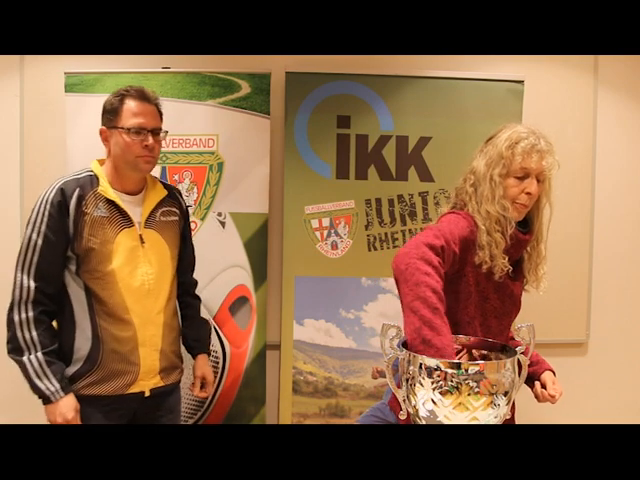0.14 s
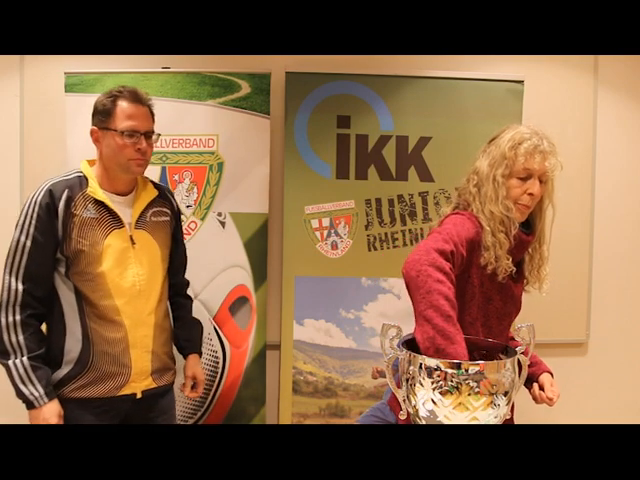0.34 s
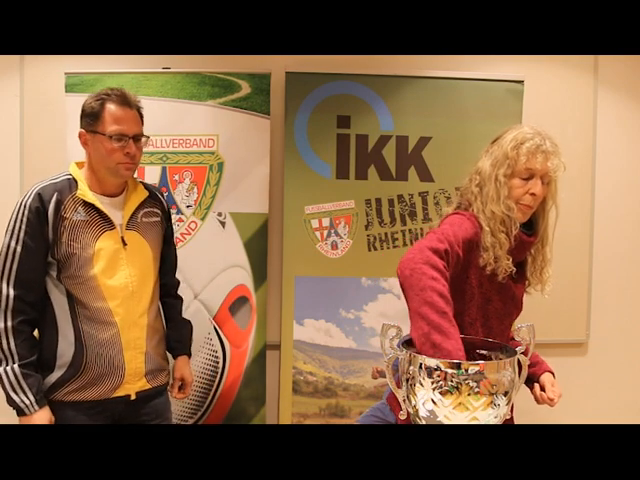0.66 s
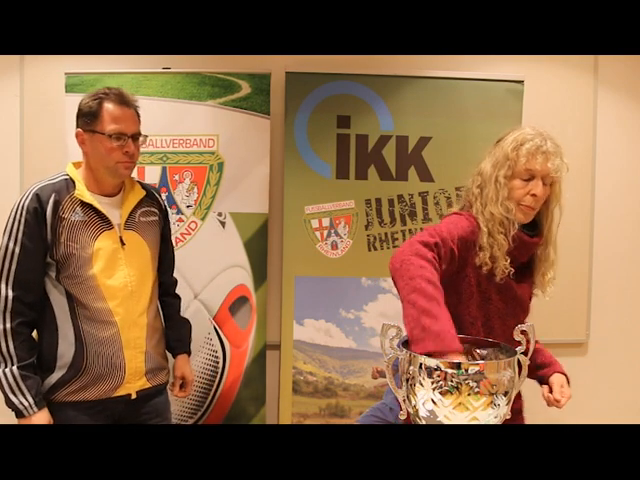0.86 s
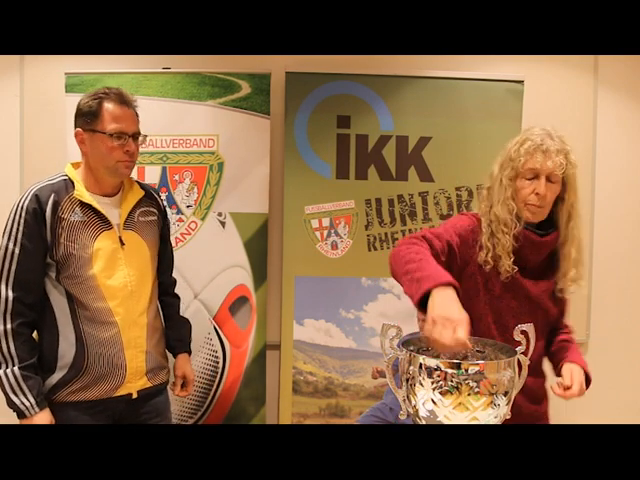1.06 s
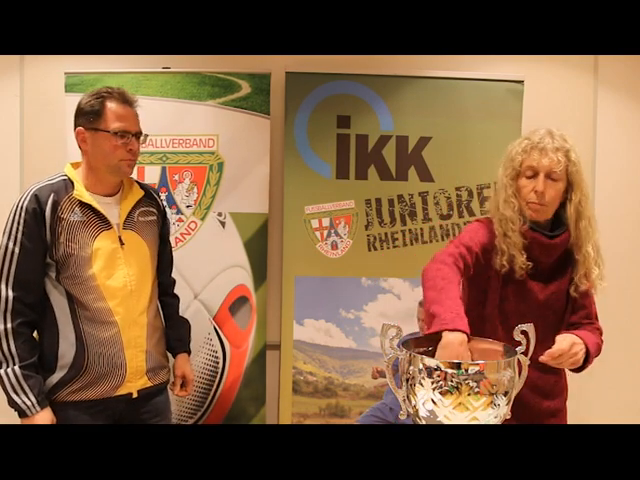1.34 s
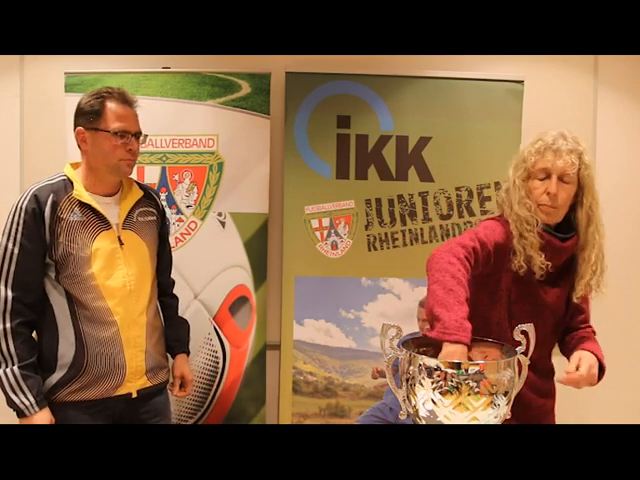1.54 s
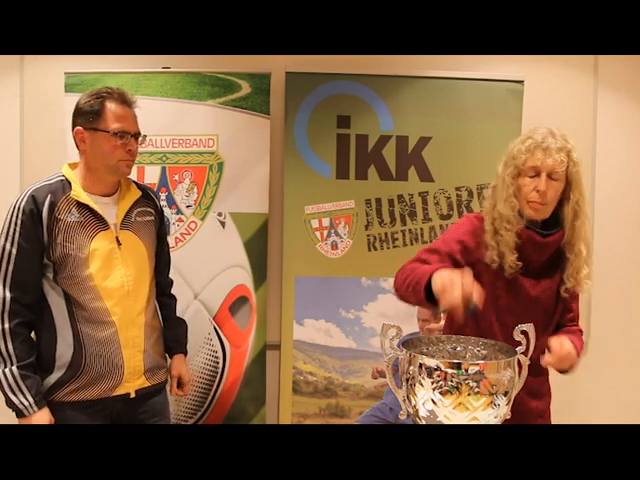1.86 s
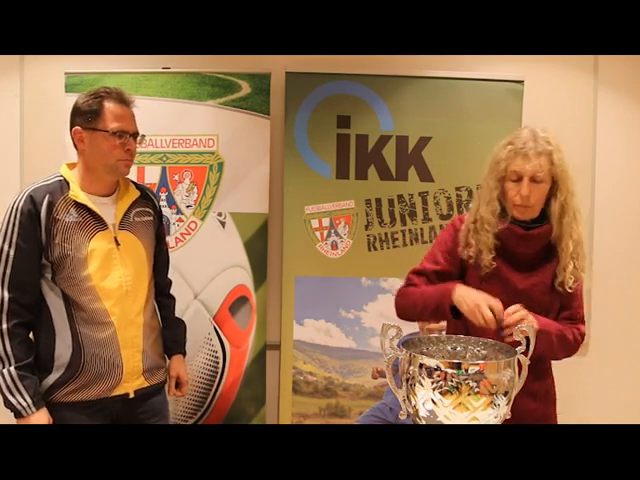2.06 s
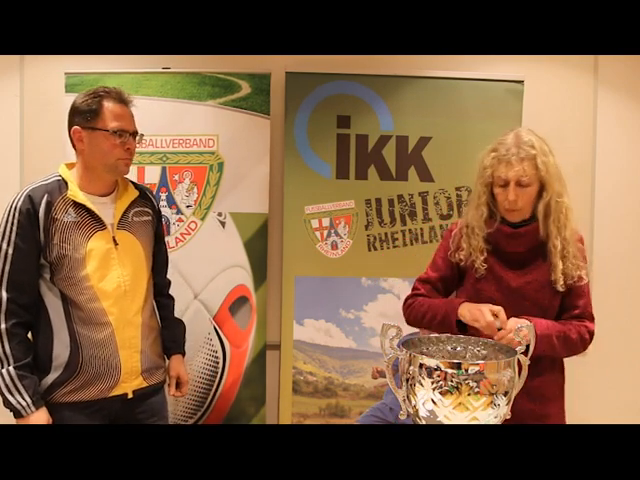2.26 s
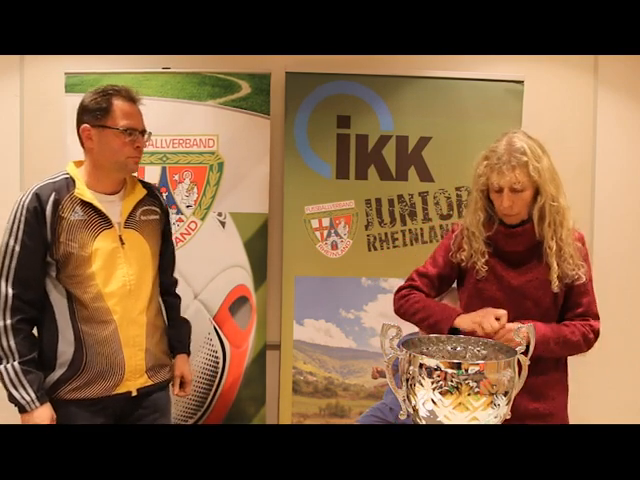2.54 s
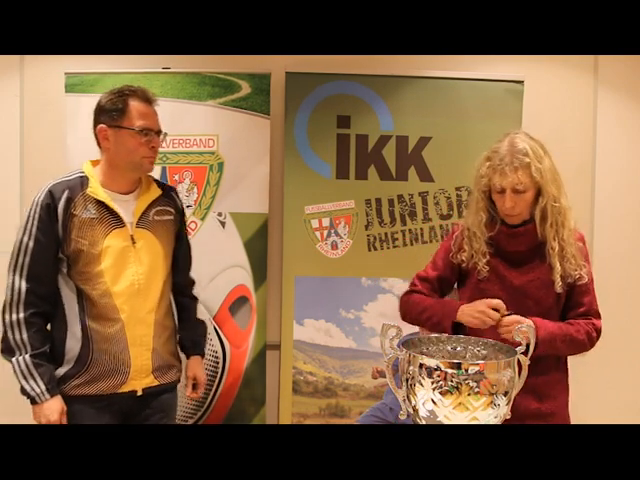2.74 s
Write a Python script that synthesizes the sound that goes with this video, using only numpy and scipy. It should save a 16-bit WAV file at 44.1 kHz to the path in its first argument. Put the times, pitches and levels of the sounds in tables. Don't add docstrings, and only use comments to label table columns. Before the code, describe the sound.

Hard little capsules are stirred by hand in a large metal cup, clattering and ringing brightly; then quiet finger rustling and a sharp snap as one opens, close to the microphone in a slightly echoing office.

```python
import sys
import numpy as np
from scipy import signal
from scipy.fft import rfft, irfft, next_fast_len
from scipy.io import wavfile
from scipy.ndimage import uniform_filter1d

SR = 44100
rng = np.random.default_rng(int(sys.argv[2]) if len(sys.argv) > 2 else 0)


def gain_from_db(level_db):
    decades = np.asarray(level_db, float) / 20
    return 10 ** decades


def put_to_file(sound):
    columns = np.atleast_2d(sound).T
    safe = np.clip(columns, -1, 1)
    whole_steps = np.round(safe * 32767)
    wavfile.write(sys.argv[1], SR, whole_steps.astype(np.int16))


N = 127890


def unit(x):
    return x / np.sqrt(np.mean(x ** 2) + 1e-20)


def along(points, hz):
    f, value = np.transpose(points)
    return np.interp(np.log(hz + 1), np.log(f + 1), value)


def curve(rows, s):
    return np.interp(s, *np.transpose(rows))


def filtered(x, response):
    m = next_fast_len(N + SR // 2)
    return irfft(rfft(x, m) * response(np.fft.rfftfreq(m, 1 / SR)), m)[..., :N]


def spikes(s, size):
    place = np.clip(np.round(s * SR).astype(int), 0, N - 1)
    return np.bincount(place, size, N)


def decay(t60):
    return gain_from_db(-60 / (t60 * SR))


def ring(x, hz, t60):
    r = decay(max(t60, 0.002))
    w = 2 * np.pi * min(hz, SR * 0.45) / SR
    return signal.lfilter([0, np.sin(w)], [1, -2 * r * np.cos(w), r * r], x)


def burst(x, t60):
    envelope = signal.lfilter([1], [1, -decay(max(t60, 0.001))], np.abs(x))
    return envelope * rng.standard_normal(N)


# t/s, peak level/dB, brightness/dB per octave, loudest region f/Hz
KNOCKS = [(0, -5, -5, 1520), (.3015, -5, 4, 6960), (.947, -17, -10, 1120), (1.142, 2, 4, 3380),
          (1.31, -4.5, -3, 1150), (1.6, -10, -2.5, 1140), (0.0142, -21, 9, 1880),
          (0.0794, -0.5, -0.5, 1810), (0.1, -2.5, -3, 3100), (0.1235, -1.5, 0, 4840), (0.184, -1, -2, 2700),
          (0.205, -2, -1.5, 1890), (0.3639, 1, -0.5, 3580), (0.4095, -6, -4, 2900), (0.354, -6, 2, 5000),
          (0.4806, -5, -4, 2900), (0.5403, -1.5, -2, 1950), (0.5794, -3, -9, 3040), (0.61, -5.5, 0, 1120),
          (0.6211, -2, 3.5, 3250), (0.6546, -12.5, -1, 2960), (1.317, -14, 5, 6500),
          (0.8196, -19, 1.5, 1790), (0.9089, -10.5, -2, 1840), (1.2339, -0.5, 3, 1810),
          (1.2529, -7.5, -0.5, 1830), (1.3391, -1.5, -3, 1820), (1.3547, -8.5, 1.5, 2660),
          (1.3894, -11, -5, 1820), (1.5382, -4.5, 2, 1650)]
# t/s, level/dB
STIRRING = [(0, -8.5), (.1, -30.5), (.25, -18.5), (.45, -21.5), (.6, -16.5), (.72, -20), (.85, -29.5),
            (.97, -29), (1.08, -54), (1.2, -22), (1.33, -17), (1.43, -23.5), (1.52, -30.5), (1.57, -16.5),
            (1.65, -39.5), (1.74, -47), (1.82, -57)]
# t/s, brightness/dB per octave
DIGGING = [(0, -3.5), (.6, -2), (.95, -4.5), (1.2, -1.5), (1.4, -4.5), (1.7, -6)]


def contacts():
    rattle_per_s, spread_db = 480, 2.5
    draw = rng.random((1200, 2))
    last = STIRRING[-1][0]
    s = np.cumsum(-np.log(1 - draw[:, 0])) / rattle_per_s
    s = np.minimum(s, last)
    db = curve(STIRRING, s) - spread_db * np.log(1 - draw[:, 1]) + 0.5
    db = db - 200 * (s >= last)
    rattle = np.transpose([s, db, curve(DIGGING, s)])
    return np.vstack([np.array(KNOCKS)[:, :3], rattle]).T


BOWL_HZ = [1069, 1126, 1224, 1413, 1778, 1796, 1822, 1867, 2069, 2229, 2423, 2478, 2628, 2721]
# level/dB, t60/s
BOWL = [(-12.5, 0.53), (-28.5, 0.98), (-5.5, 0.23), (-22.5, 0.77), (-3, 0.35), (-1.5, 0.07), (4, 0.058),
        (3, 0.26), (-3, 0.13), (-5.5, 0.69), (-16, 0.6), (-17.5, 0.42), (-14, 0.36), (-6.5, 0.14)]
RIM_HZ = [1555, 2385, 2574, 2737, 2769, 2832, 2944, 3073, 3264, 3530, 3833, 4215, 4323, 4938]
# level/dB, t60/s
RIM = [(-32.5, 2.3), (-20, 1.5), (-16, 0.57), (-12, 1.06), (-9, 0.78), (-1, 0.28), (-2.5, 0.91),
       (-17, 0.28), (-22, 0.18), (-4, 0.15), (-1, 0.11), (-4.5, 0.23), (-0.5, 0.039), (-1.5, 0.15)]
# f/Hz, level/dB
CROWD = [(500, -48.5), (900, -25.5), (1800, -15.5), (3200, -13.5), (5400, -22), (7000, -22.5),
         (10000, -27.5), (16000, -45)]
# f/Hz, t60/s
CROWD_T60 = [(500, 0.045), (2000, 0.15), (6000, 0.24), (16000, 0.15)]


def cup():
    s, db, tilt_db = contacts()
    tilt_db = np.clip(tilt_db, -12, 7)

    draw = rng.random((480, 2))
    hz = 700 + 15300 * np.sort(draw[:, 0]) ** 1.3
    crowd_t60 = along(CROWD_T60, hz) * (0.6 + 0.5 * draw[:, 1])
    crowd = np.transpose([hz, along(CROWD, hz), crowd_t60])
    modes = np.vstack([np.c_[BOWL_HZ, BOWL], np.c_[RIM_HZ, RIM], crowd])
    mode_hz, mode_db, mode_t60 = modes.T
    main = np.arange(len(modes)) < len(BOWL) + len(RIM)

    spot = rng.standard_normal((len(s), len(modes)))
    spot_db, ring_db, shared_ring_db = 3.5, -20, -4
    gain_db = db[:, None] + spot_db * spot + tilt_db[:, None] * np.log2(mode_hz / 2500)
    gain_db += mode_db + ring_db + shared_ring_db * main

    patches = uniform_filter1d(rng.standard_normal((len(s), len(crowd))), size=30, axis=1)
    gain_db[:, -len(crowd):] += 2.5 * unit(patches)

    splash_db, splash_octaves, knock_ring_db = 7.5, 0.17, -4.5
    octaves = np.log2(mode_hz[:, None].T / np.array(KNOCKS)[:, 3:])
    splash = splash_db * np.exp(-0.5 * (octaves / splash_octaves) ** 2)
    gain_db[:len(KNOCKS)] += splash + knock_ring_db * main

    gains = np.sign(spot[:, ::-1]) * gain_from_db(gain_db)
    metal = np.zeros(N)
    for g, f, t60 in zip(gains.T, mode_hz, mode_t60):
        metal += ring(spikes(s, g), f, t60)

    clear = np.arange(len(s)) < len(KNOCKS)
    blows = spikes(s, clear * gain_from_db(db + tilt_db))
    crack_db, crack_s, tick_db, tick_s = -11, 0.035, -13, 0.0032
    cracks = gain_from_db(crack_db) * burst(blows, crack_s) + gain_from_db(tick_db) * burst(blows, tick_s)
    return metal + filtered(cracks, lambda f: gain_from_db(along(CROWD, f) + 17))


CLINK_HZ = [1093, 1413, 4215, 1069, 1224, 1555, 1778, 1822, 1867, 2069, 2229, 2385, 2423, 2478, 2574, 2769,
            2832, 2944, 3155, 3264, 3530, 4323, 4748, 4938, 5787, 6500]
# t/s, level/dB
CLINKS = [(0.44, [(.99, -33), (1.143, -27.5)]), (0.37, [(.014, -34), (.205, -23.5), (.75, -40.5)]),
          (.2, [(.3015, -26), (.625, -19)]), (.55, [(1.31, -16.5), (1.39, -26.5), (1.6, -28.5)]),
          (0.27, [(.947, -30), (1.01, -26), (1.31, -31), (1.63, -22)]), (1.4, [(1.54, -33)]),
          (0.17, [(0, -28), (.505, -12), (.909, -35), (1.144, -16), (1.253, -17), (1.339, -19),
          (1.58, -19)]), (0.28, [(.012, -11.5), (.0794, -21.5), (.125, -20), (.3, -22), (.5403, -21),
          (1.2335, -11)]), (0.62, [(.034, -18), (.205, -19.5), (1.575, -35)]), (0.32, [(.025, -18.5),
          (.385, -19.5)]), (0.62, [(.515, -19), (.82, -34.5), (.92, -34.5), (1.253, -28), (1.58, -31)]),
          (0.71, [(1.3547, -20.5), (1.545, -31)]), (0.94, [(.909, -29)]), (0.7, [(.75, -46)]),
          (1.2, [(.26, -23), (.505, -24.5), (1.6, -48), (1.69, -39)]), (0.32, [(.11, -32), (.65, -16.5),
          (.83, -28), (1.585, -30)]), (0.63, [(.03, -18.5), (.094, -11), (.184, -23), (.345, -23.5),
          (.4, -18), (.46, -21.5), (.575, -27), (.645, -36)]), (0.38, [(.018, -14), (.5403, -19),
          (1.24, -24), (1.55, -23)]), (0.43, [(1.142, -18.5)]), (.25, [(.2, -18.5), (.3639, -15),
          (1.15, -22.5)]), (0.22, [(.3639, -22)]), (0.26, [(.3015, -21), (.621, -14), (.92, -31.5),
          (1.277, -24), (1.545, -24)]), (.15, [(1.148, -21)]), (.15, [(1.2335, -22), (1.54, -34)]),
          (0.22, [(.545, -26.5), (1.142, -22)]), (0.13, [(.3015, -21), (.63, -20)])]


def clinks():
    twin_share, twin_ratio = 0.35, 1.006
    out, t = np.zeros(N), np.arange(N) / SR
    for hz, (t60, hits) in zip(CLINK_HZ, CLINKS):
        s, db = np.transpose(hits)
        tone = np.sin(2 * np.pi * hz * t)
        twin = np.sin(2 * np.pi * hz * twin_ratio * t)
        swell = signal.lfilter([1], [1, -decay(max(t60, 0.05))], spikes(s, gain_from_db(db)))
        out += swell * (tone + twin_share * twin)
    return out


# f/Hz, width/Hz, level/dB
HOLLOW = [(104, 42, 0.5), (159.3, 9.9, -10.5), (350, 45, -3.5), (466, 116, -2.5), (624, 29, -5.5),
          (830, 26.5, -8)]
# t/s, level/dB
WEIGHT = [(0, -22.5), (.3, -20), (.7, -16), (.9, -19), (1.1, -19), (1.2, -13.5), (1.42, -14.5),
          (1.65, -15.5), (1.85, -41)]
# t/s, peak level/dB, f/Hz
THUDS = [(.005, -28.5, 650), (0.202, -22, 830), (.3, -28, 633), (0.605, -15, 937), (.69, -24, 620),
         (0.931, -28, 540), (0.946, -21, 464), (1.142, -26.5, 431), (1.234, -22.5, 496),
         (1.254, -23.5, 350), (1.29, -27, 452), (1.34, -25, 392), (1.54, -31.5, 405)]


def hollow():
    heap_db, thud_t60, push_s = -17, 0.09, 0.0012
    weight = gain_from_db(curve(WEIGHT, np.arange(N) / SR) + heap_db - 23)
    heap = weight * rng.standard_normal((len(HOLLOW), N))
    out = np.zeros(N)
    for push, (hz, width, db) in zip(heap, HOLLOW):
        out += gain_from_db(db) * ring(push, hz, 2.16 / width)
    soft = np.hanning(int(push_s * SR) + 3)
    for s, db, hz in THUDS:
        hit = spikes(np.array([s]), [gain_from_db(db)])
        push = signal.lfilter(soft, [push_s * SR / 4], hit)
        out += ring(push, hz, thud_t60)
        out += 0.5 * ring(push, 1.3 * hz, 1.1 * thud_t60)
    return out


# f/Hz, t60/s
OFFICE = [(150, 0.66), (1000, 0.53), (4000, 0.52), (16000, 0.27)]


def office(x):
    out, step = np.zeros(N + 2 * SR), SR // 10
    delay = 130
    for k in range(0, N, step):
        hz, t, z = signal.stft(rng.standard_normal(SR // 2), SR, nperseg=256)
        t60 = np.maximum(along(OFFICE, hz), 0.02)[:, None]
        tail = signal.istft(z * gain_from_db(-60 * t / t60), SR, nperseg=256)[1]
        start, stop = max(k - step, 0), min(k + step, N)
        fade = np.cos(np.pi / 2 * (np.arange(start, stop) - k) / step) ** 2
        wet = signal.fftconvolve(x[start:stop] * fade, tail / np.linalg.norm(tail))
        out[start + delay:][:len(wet)] += wet
    return out[:N]


# f/Hz, level/dB per Hz
AIR = [(12, -30), (20, -14.5), (285, -5), (356, -4), (716, -10), (921, -10.5), (1320, -9), (2660, -11.5),
       (15900, -23.5)]


def air():
    air_db, roll_hz = -47, 14600
    noise = rng.standard_normal(N)
    return gain_from_db(air_db) * unit(filtered(noise, lambda f: gain_from_db(along(AIR, f)) / (1 + (f / roll_hz) ** 8)))


# t/s, level/dB, centre f/Hz, t60/s
BRUSHES = [
    (0.912, -33, 8000, 0.019),
    (1.04, -39, 10000, 0.14),
    (1.735, -39, 9700, 0.15),
    (2.155, -34, 5000, 0.18),
    (2.27, -37.5, 5000, 0.11),
    (2.384, -31, 2580, 0.096),
    (2.447, -30, 2500, 0.13),
    (2.566, -29, 1500, .05),
    (2.668, -18.5, 4300, 0.017),
    (2.668, -26.5, 6800, 0.14),
]


def brushes():
    out, t = np.zeros(N), np.arange(N) / SR
    for s, db, hz, t60 in BRUSHES:
        puff = burst(spikes(np.array([s]), [gain_from_db(db)]), t60)
        rise_s = 0.28 * t60 ** 1.83
        puff = puff * np.clip((t - s) / rise_s, 0, 1)
        octaves = 0.55 if t60 > 0.03 else 1
        out += filtered(puff, lambda f: np.exp(-0.5 * (np.log2((f + 1) / hz) / octaves) ** 4))
    return out


# t/s, level/dB
RUSTLE = [(1.9, -74), (2.17, -62), (2.22, -59), (2.4, -48.5), (2.52, -63), (2.6, -42), (2.7, -48),
          (2.9, -85)]
# f/Hz, level/dB
RUSTLE_TONE = [(300, 4.5), (800, -1), (2500, 1.5), (5000, -6), (16000, -19.5)]


def rustle():
    t = np.arange(N) / SR
    slips = spikes(rng.random(2500) * N / SR, gain_from_db(2.5 * rng.exponential(size=2500)))
    grains = burst(slips, 0.019)
    grains = unit(filtered(grains, lambda f: gain_from_db(along(RUSTLE_TONE, f))))
    return grains * gain_from_db(curve(RUSTLE, t)) * (t > RUSTLE[0][0] - 0.2)


# t/s, level/dB
SNAPS = [
    (2.172, -39),
    (2.34, -41),
    (2.385, -46),
    (2.449, -45),
    (2.6658, -20),
    (2.667, -18),
    (2.6725, -33),
    (2.681, -37),
]


def snaps():
    snap_s, low_hz, high_hz = 0.0059, 2500, 5000
    s, db = np.transpose(SNAPS)
    cracks = burst(spikes(s, gain_from_db(db)), snap_s)
    return filtered(cracks, lambda f: 1j * f / (low_hz + 1j * f) / (1 + 1j * f / high_hz))


# t/s, peak level/dB, f/Hz
TICKS = [
    (2.34, -44, 614),
    (2.4, -46, 2250),
    (2.449, -42, 2640),
    (2.574, -41, 1570),
    (2.566, -37, 736),
    (2.576, -32, 740),
    (2.666, -26, 1050),
    (2.675, -26.5, 1115),
    (2.806, -47, 1098),
]


def ticks():
    shell_t60 = 0.1
    out = np.zeros(N)
    for s, db, hz in TICKS:
        hit = spikes(np.array([s]), [gain_from_db(db)])
        out += ring(hit, hz, shell_t60)
        out += 0.41 * ring(hit, 0.933 * hz, 0.5 * shell_t60)
        out += 0.27 * ring(hit, 1.55 * hz, 0.78 * shell_t60)
    return out


def scene():
    low_cut_hz, office_db = 175, -6
    near = cup() + clinks() + hollow() + brushes() + rustle() + snaps() + ticks()
    near = filtered(near, lambda f: (1j * f / (low_cut_hz + 1j * f)) ** 3)
    return np.tile(near + gain_from_db(office_db) * office(near) + air(), (2, 1))


def band_limit(x):
    return signal.sosfilt(signal.butter(12, 16080, fs=SR, output="sos"), x)


def record(dry):
    ceiling, top_hz = 1.15, 16100
    clipped = dry / (1 + np.abs(dry / ceiling) ** 6) ** (1 / 6)
    mix = filtered(clipped, lambda f: f < top_hz)
    return band_limit(mix)


dry = scene()
out = record(dry)
put_to_file(out)
```